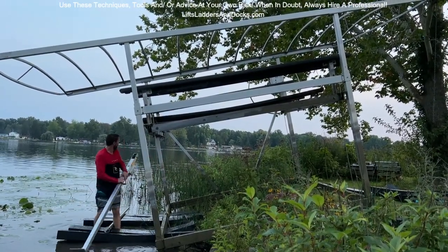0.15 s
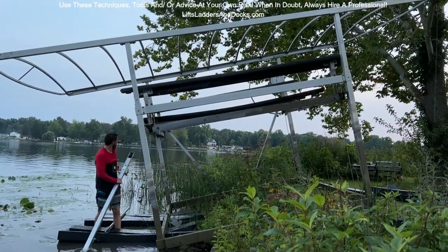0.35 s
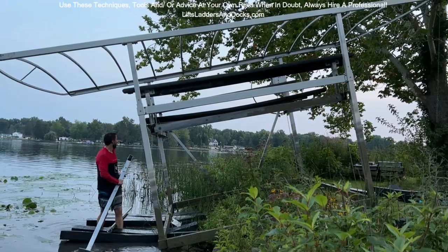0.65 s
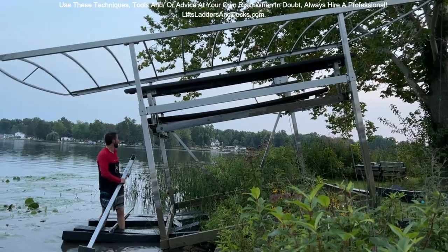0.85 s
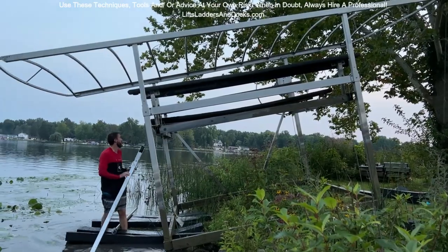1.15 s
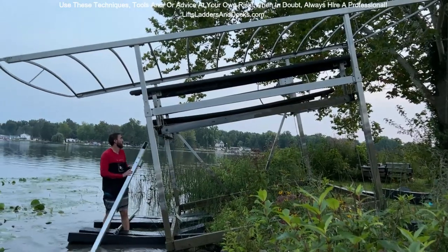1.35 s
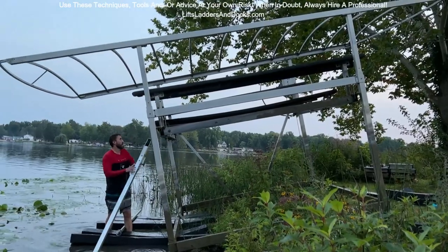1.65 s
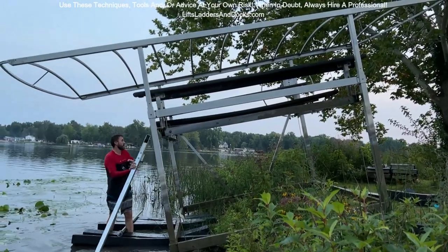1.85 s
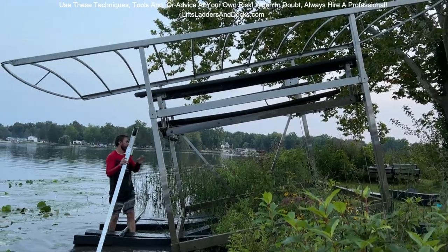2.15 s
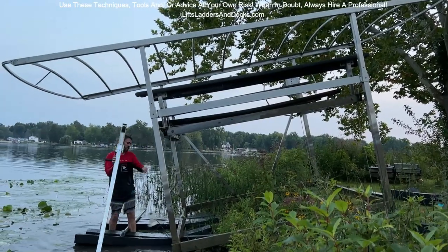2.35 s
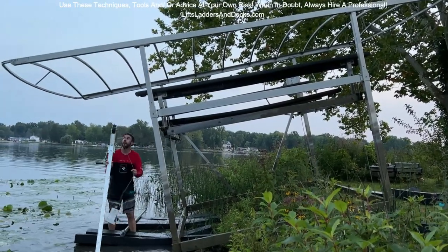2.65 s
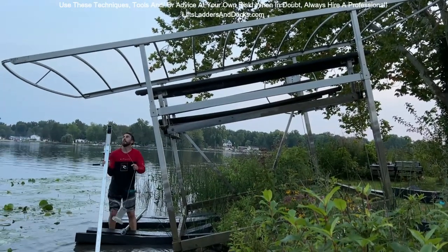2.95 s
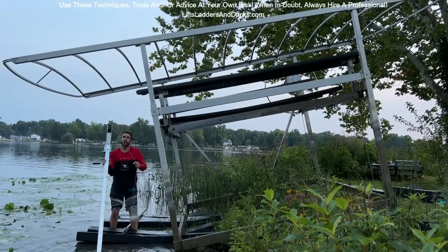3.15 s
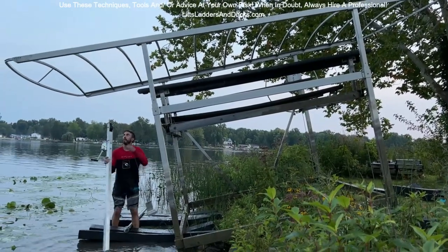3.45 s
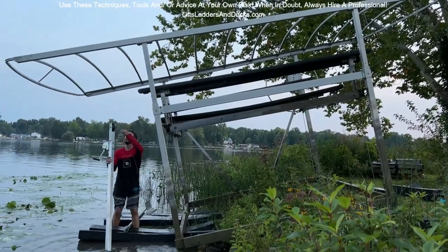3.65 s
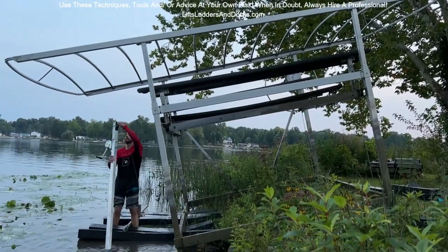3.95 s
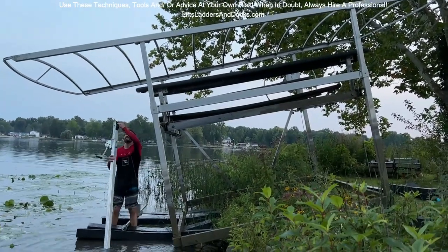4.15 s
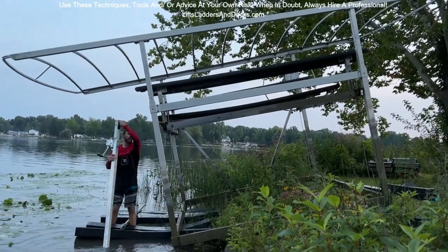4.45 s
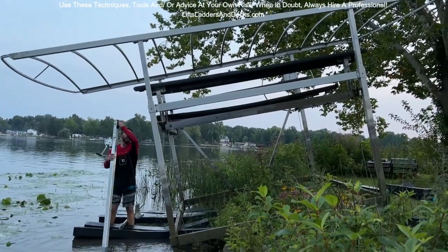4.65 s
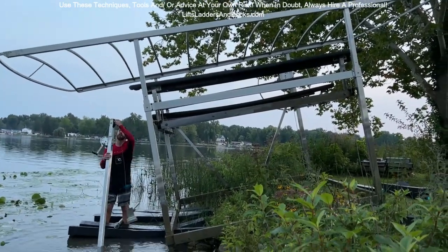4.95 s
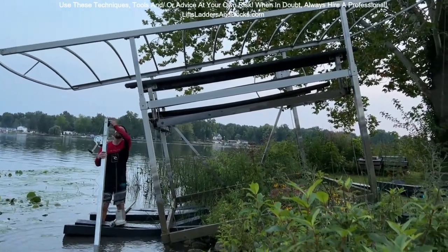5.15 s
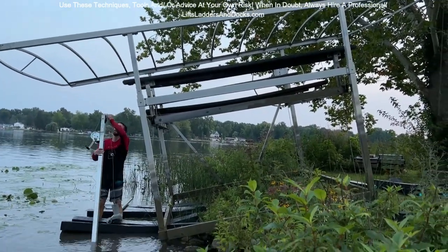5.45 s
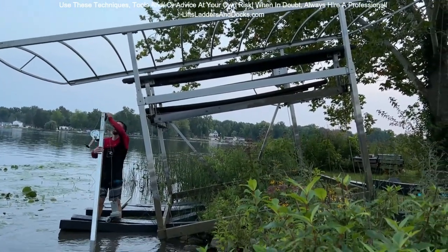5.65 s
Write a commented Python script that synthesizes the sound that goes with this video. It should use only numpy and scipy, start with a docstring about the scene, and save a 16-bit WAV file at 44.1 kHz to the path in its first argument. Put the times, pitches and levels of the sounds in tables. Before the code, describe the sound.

Dull metal blows, a bright pipe clank and a quick rattle sound from a boat lift on a quiet lakeshore with insects.

```python
"""An insect ticks in the reeds over the low rumble of a lake shore, and water laps at the dock.
A steel pipe is knocked against a metal boat lift: two dull blows and a scrape on the frame, one bright
clank of the pipe, a soft slide, then a rattle as it is set upright against the lift's fittings.
Twice the insect's ticks lead into a buzz. Heard from the bank, on a camera with two closely spaced
microphones; the lift is left of centre."""
import sys
import numpy as np
from scipy import signal
from scipy.fft import rfft, irfft, next_fast_len
from scipy.io import wavfile

SR = 44100
rng = np.random.default_rng(int(sys.argv[2]) if len(sys.argv) > 2 else 0)


def bounce(signal):
    """Save signal as a 16-bit WAV file at the path given by the first command-line argument."""
    frames = np.transpose(np.atleast_2d(signal))
    limited = np.clip(frames, -1, 1)
    pcm = np.round(limited * 32767).astype(np.int16)
    wavfile.write(sys.argv[1], SR, pcm)


N = 255558
T = np.arange(N) / SR
SIZE = next_fast_len(N)
FREQS = np.maximum(np.arange(SIZE // 2 + 1) * SR / SIZE, 1)
BANDS_HZ = 45 * 2 ** (np.arange(18) / 2)


def undb(db):
    """Decibels to gain."""
    return 10 ** (np.asarray(db) / 20)


def across(table, hz, column=1):
    """One column of a frequency table, read on a log axis."""
    table = np.array(table, float)
    return np.interp(np.log(hz), np.log(table[:, 0]), table[:, column])


def walk(rate):
    """Smooth random wander with a spread near 1."""
    points = rng.standard_normal(N // 40)
    return np.interp(T * rate, np.arange(len(points)), points)


def noise(gain, alike_hz=1567):
    """Unit stereo noise with the given spectrum; the two microphones hear nearly the same bass."""
    mid, side = rng.standard_normal((2, len(FREQS), 2)) @ np.array([1, 1j])
    alike = .97 / (1 + (FREQS / alike_hz) ** 2)
    mid, side = mid * np.sqrt(1 + alike), side * np.sqrt(1 - alike)
    stereo = irfft(np.array([mid + side, mid - side]) * gain, SIZE)[:, :N]
    return stereo / stereo.std()


def add(out, s, sound):
    """Mix a sound in at time s."""
    i = max(int(s * SR), 0)
    out[:, i:i + sound.shape[-1]] += sound[..., :N - i]


def efforts(rows, attack_s, release_s, growth_db_per_s):
    """Gain over time: each effort builds up, holds with a steady trend, then dies away."""
    power = 0
    for s, length, db in rows:
        held = undb(db + growth_db_per_s * np.clip(T - s, 0, length))
        attack = np.clip((T - s) / attack_s, 0, 1)
        release = np.exp(-np.maximum(T - s - length, 0) / release_s)
        power = power + (held * attack * release) ** 2
    return np.sqrt(power)


# The background at the bank. Each row: frequency in Hz, relative level in dB.
SHORE_COLOUR = [(15, -49), (25, -16), (59, 6), (110, -1), (229, -15), (362, -16), (412, -13), (444, -10),
                (685, -22), (1260, -24.5), (2330, -26), (4180, -31.5), (4990, -25.5), (10200, -50.5),
                (11000, -41.5), (14300, -67.5), (22000, -120)]
def shore(level_db=-53):
    """Low distant rumble and light air over the lake."""
    return noise(undb(across(SHORE_COLOUR, FREQS))) * undb(level_db + 1.1 * walk(20))


# Ticks from the reeds. Each row: start in seconds, length in seconds, ticks per second,
# first level in dB, growth in dB per second.
TICK_RUNS = [(-.033, .39, 9, -52, 10), (3.326, 1.18, 8.03, -62.5, 12)]
def ticking(attack_s=.0028, fade_s=.065):
    """Gain over time of the insect's ticks: evenly spaced wing flicks, each louder than the last."""
    gain = np.zeros(N)
    for s, length, rate, db, growth_db in TICK_RUNS:
        for after in np.arange(0, length, 1 / rate):
            age = np.maximum(T - s - after, 0)
            gain += undb(db + growth_db * after) * (1 - np.exp(-age / attack_s)) * np.exp(-age / fade_s)
    return gain


# The long buzz after each run. Each row: start in seconds, length in seconds, level in dB.
BUZZES = [(.52, 1.9, -49.5), (4.35, 1.5, -57)]
# The rasp of the wings. Each row: frequency in Hz, relative level in dB.
INSECT_COLOUR = [(6000, -46), (8500, -20), (10500, -33.5), (11600, -8), (12400, -10), (13700, -17),
                 (15500, -15), (17000, -12.5)]
def insects(stroke_hz=28, throb_db=1.5, flutter_db=2.4, chorus_db=-72):
    """Wing strokes rasp high in the treble: one insect ticks and buzzes over a far-off chorus."""
    strokes = np.sin(2 * np.pi * np.cumsum(stroke_hz * (1 + .04 * walk(4.5))) / SR)
    buzz = efforts(BUZZES, attack_s=.27, release_s=.1235, growth_db_per_s=-1.3) * undb(throb_db * strokes)
    song = np.sqrt(buzz ** 2 + ticking() ** 2 + undb(chorus_db) ** 2)
    return noise(undb(across(INSECT_COLOUR, FREQS))) * song * undb(flutter_db * walk(60))


# Water at the dock. Each row: start in seconds, bubble pitch in Hz, level in dB, t60 in seconds.
LAPS = [(0.145, 1196, -44, 0.15), (0.798, 1166, -47.5, 0.13), (1.103, 927, -34, 0.076),
        (3.64, 224, -32, 0.045), (3.67, 325, -41, 0.06), (4.823, 224, -35, 0.026),
        (4.913, 220.6, -41.5, 0.04), (5.044, 305, -36.5, 0.043), (5.762, 880, -44.5, 0.05)]
def water(splash_db=-2):
    """Each lap is a short bubble whose note rises a little, inside a small splash."""
    out, t = np.zeros((2, N)), T[:N // 25]
    for s, hz, db, t60 in LAPS:
        bubble = np.sin(2 * np.pi * hz * t * (1 + t))
        splash = noise(1 / (1 + np.log2(FREQS / hz) ** 2) ** 4)[:, :len(t)]
        fade = (1 - np.exp(-t / .0019)) * np.exp(-np.log(1000) * t / t60)
        add(out, s, undb(db) * fade * (bubble + undb(splash_db) * splash))
    return out


def crowded_modes(hz):
    """One band of closely spaced metal modes; toward the treble some stand well above the rest."""
    mode_index = (90 * np.log(1 + FREQS / 1200)).astype(int)
    strength_db = min(hz / 250, 5) * rng.standard_normal(N // 200)
    window = np.sqrt(np.maximum(1 - 2 * abs(np.log2(FREQS / hz)), 0))
    return noise(window * undb(strength_db[mode_index]))


def blows(hits, modes, body, bands, chatter_db, fade_power, modes_db):
    """Each blow on metal rings a few clear modes over a dense crowd of others."""
    out, t = np.zeros((2, N)), T[:N // 4]
    for s, db, rise, tilt_db, ring_factor, spot_hz, spot_db in hits:
        def colour(hz):
            """A harder contact is brighter, and each striking spot favours its own band."""
            return tilt_db * np.log2(hz / 1000) + spot_db * np.exp(-(2 * np.log2(hz / spot_hz)) ** 2)
        start = rng.integers(N - len(t))
        # the surfaces chatter for some milliseconds before they part
        chatter = undb(chatter_db * walk(900)[:len(t)] * np.exp(-t / .037))
        crowd = 0
        for hz, band in zip(BANDS_HZ, bands):
            # bending waves are faster in the treble, so the bass builds up later
            attack = 1 - np.exp(-t / (rise * np.sqrt(1000 / hz)))
            # many decay rates together: a quick drop, then a lingering tail
            fade = (1 + t / (ring_factor * across(body, hz, column=2))) ** -fade_power
            gain = undb(across(body, hz) + colour(hz))
            crowd = crowd + band[:, start:start + len(t)] * attack * fade * gain
        ring = 0
        for hz, mode_db, t60 in modes:
            # higher modes reach the two microphones further out of step
            phase = 2 * np.pi * rng.random() + (2 * rng.random((2, 1)) - 1) * min(hz / 1000, np.pi / 2)
            fade = np.exp(-np.log(1000) * t / (t60 * ring_factor))
            gain = np.sqrt(2) * undb(mode_db + modes_db + colour(hz))
            ring = ring + gain * fade * np.sin(2 * np.pi * hz * t + phase)
        add(out, s, undb(db) * (crowd * chatter + ring * (1 - np.exp(-t / rise))))
    return out


# Blows on the lift's frame. Each row: start in seconds, level in dB, rise in seconds, brightness
# in dB per octave, ring length as a factor, favoured band in Hz, its boost in dB.
FRAME_HITS = [(.304, -44.5, 0.0017, 8.5, 3.7, 7000, 2.5), (.402, 2, 0.0044, 0.5, 0.98, 4800, 0.5),
              (1.124, -23.5, 0.00069, 2.5, 2, 5300, 4.5), (1.186, -23.5, 0.0012, 0, 1.14, 1210, 2),
              (1.268, -5, 0.0015, -0.55, 1.04, 1497, 7.5), (1.599, -23.5, 0.0017, 0.5, 0.45, 611, 10),
              (1.665, -35.5, 0.0035, 4.5, 0.59, 650, 9.5), (1.692, -29, 0.0035, 4, 2.7, 723, 12.5),
              (1.955, -22.5, 0.013, -2.5, 0.87, 605, -2.5), (3.635, -23, 0.00097, 0, 0.12, 252, 7)]
# Its clear modes. Each row: frequency in Hz, relative level in dB, base t60 in seconds.
FRAME_MODES = [(260, -40, .4), (366, -31, .6), (360, -42, 2.3), (421, -33, .4), (440, -37, 1.6),
               (483, -45, 1.2), (520, -35, .7), (544, -39, .9), (575, -43, 1.1), (598, -29, .45),
               (642, -36, .9), (715, -31, .35), (755, -35, .55), (785, -41, .8), (878, -33, .6),
               (904, -24, .22), (943, -33, .6), (991, -39, .8), (1055, -33, .4), (1123, -36, .35),
               (1184, -40, .4), (1328, -29, .28), (1400, -41, .34), (1642, -32, .3), (1803, -39, .22),
               (2172, -42, .3)]
# Its crowd of modes. Each row: frequency in Hz, relative level in dB, base fading time in seconds.
FRAME_BODY = [(50, -45, .06), (132.4, -37, .08), (287.2, -29, 0.053), (640, -19.5, 0.071),
              (1031, -23.5, 0.047), (2140, -29, 0.039), (4550, -28.5, 0.022), (7900, -41.5, 0.045),
              (15000, -57, 0.034)]
def frame_knocks(bands):
    """The pipe strikes the frame, which answers with a dull, lingering ring."""
    return blows(FRAME_HITS, FRAME_MODES, FRAME_BODY, bands, chatter_db=4, fade_power=1.975, modes_db=-.5)


# The pipe landing on the frame. Each row: start in seconds, slip rate in Hz, length in seconds,
# level in dB.
JUDDERS = [(.404, 618, .043, -13.5), (1.271, 640, .022, -25), (1.70, 660, .035, -36)]
def judder(overtone_db=-20):
    """Steel sticks and slips on the frame: a short rough honk that stops when the pipe comes to rest."""
    out, t = np.zeros((2, N)), T[:N // 40]
    for s, hz, length, db in JUDDERS:
        phase = 2 * np.pi * np.cumsum(hz * (1 + .025 * walk(300)[:len(t)])) / SR
        honk = np.sin(phase) + undb(overtone_db) * np.sin(2 * phase)
        grip = (1 - np.exp(-t / .0015)) * np.exp(-(t / length) ** 8)
        roughness_db = 2.5 * walk(300)[:len(t)]
        add(out, s, np.sqrt(2) * grip * undb(db + roughness_db) * honk)
    return out


def scrape(push, colour, rings, grain_db, uneven_db=2.2):
    """Dense little catches of metal on metal, in uneven pushes, sounding the pipe's resonances."""
    boost_db = sum(db / (1 + (2 * (FREQS - hz) / width) ** 2) for hz, width, db in rings)
    friction = noise(undb(across(colour, FREQS) + boost_db))
    return friction * push * undb(grain_db * walk(500) + uneven_db * walk(50))


# The drag along the frame. Each row: start in seconds, length in seconds, starting level in dB.
DRAGS = [(1.675, 0.29, -46.5)]
# Its colour. Each row: frequency in Hz, relative level in dB.
DRAG_COLOUR = [(120, -42.5), (200, -34), (264, 4), (332, -43), (484, 8.5), (517, -5), (1270, -10.5),
               (1380, -10), (2450, -16.5), (3620, -21), (4060, -25), (6320, -28.5), (10000, -41),
               (13000, -48), (22000, -120)]
# Its resonances. Each row: frequency in Hz, width in Hz, boost in dB.
DRAG_RINGS = [(510, 59, 1), (1740, 120, 8), (3570, 52, 18.5), (4530, 140, 14.5), (5160, 120, 9),
              (6350, 89, 16)]
def pipe_drag():
    """The pipe drags along the frame in one push, leaning harder as it goes."""
    push = efforts(DRAGS, attack_s=.063, release_s=.041, growth_db_per_s=17)
    return scrape(push, DRAG_COLOUR, DRAG_RINGS, grain_db=3.5)


# Blows that ring the pipe, its clear modes and its crowd of modes. Rows read as for the frame.
PIPE_HITS = [(2.6865, 2, 0.0019, -2, 0.86, 3023, 0.54), (4.348, -35, 0.00072, -3.5, 0.55, 2100, 20),
             (4.988, -42.5, 0.0018, 1.5, 0.27, 2700, 8.6)]
PIPE_MODES = [(728, -22, .09), (1008, -14.5, .15), (1071, -39, .6), (1150, -29, .22), (1365, -33, .22),
              (1487, -49, .8), (1524, -18, .13), (1611, -33, .62), (1937, -27, .15), (2040, -28, .15),
              (2118, -48, .6), (2690, -24, .24), (2764, -29, .25), (2774, -48, 1.25), (2760, -51, 1.25),
              (2852, -24, .21), (2904, -29, .25), (2958, -27, .12), (3030, -32, .22), (3392, -32, .15),
              (3560, -22, .17), (3553, -53, .8), (4463, -33, .17), (4636, -34, .15), (5375, -35, .32),
              (6245, -42, .35), (8037, -42, .16), (11660, -39, .12)]
PIPE_BODY = [(100.6, -61.5, 0.0326), (275, -41, 0.035), (420, -27, 0.012), (705, -26, .02),
             (1094, -29.5, 0.06), (2157, -29, 0.067), (2930, -10, 0.0148), (4100, -18.5, 0.029),
             (5760, -14.5, 0.033), (8350, -24, 0.035), (12070, -15.5, 0.0072), (16000, -46.5, 0.028)]
def pipe_clank(bands):
    """The steel pipe itself rings: one bright clank, later two faint taps."""
    return blows(PIPE_HITS, PIPE_MODES, PIPE_BODY, bands, chatter_db=1.6, fade_power=2.2, modes_db=0)


# Faint hisses on both microphones. Each row: middle in seconds, spread in seconds, frequency in Hz,
# width in Hz, level in dB.
HISSES = [(3.176, 0.29, 5270, 1390, -60.5), (3.92, 0.28, 8740, 1202, -65), (4.417, 0.12, 8670, 986, -65),
          (4.637, 0.41, 1970, 290, -58.5), (5.545, 0.084, 1666, 497, -55.5)]
def hisses():
    """Narrow soft hisses that swell and fade."""
    out = np.zeros((2, N))
    for s, spread, hz, width, db in HISSES:
        swell = np.exp(-2 * ((T - s) / spread) ** 2)
        out += noise(1 / (1 + (2 * (FREQS - hz) / width) ** 2)) * undb(db) * swell
    return out


# The slide's pushes, colour and resonances. Rows read as for the drag.
SLIDES = [(3.71, 1.11, -63), (4.08, 0.33, -54.5), (4.28, .1, -55.5), (5.49, 0.089, -59)]
SLIDE_COLOUR = [(180, -12.5), (300, -5.5), (1110, -9.5), (1320, -15.5), (1770, -6), (2780, -25),
                (3060, -16), (8000, -28.5), (10400, -33), (17600, -120)]
SLIDE_RINGS = [(960, 160, 3.5), (1115, 36, 7), (1714, 250, 1.5), (2810, 110, 15)]
def pipe_slide():
    """The pipe slides into place in gentler pushes."""
    push = efforts(SLIDES, attack_s=.054, release_s=.059, growth_db_per_s=-2)
    return scrape(push, SLIDE_COLOUR, SLIDE_RINGS, grain_db=2.8)


# Blows on the lift's fittings, their clear modes and their crowd of modes. Rows read as for the frame.
FITTING_HITS = [(5.148, -0.5, 0.0014, 2.5, 0.87, 890, 5.9), (5.1935, 2.5, 0.0019, 1.5, 0.29, 1760, 6),
                (5.258, -6, 0.00057, 2.5, 0.25, 5900, 5.1), (5.359, -4, 0.0013, -1, 0.43, 6160, 0.54),
                (5.497, -20, 0.0028, 1.5, 0.14, 4630, 10.5), (5.592, -20.5, 0.014, -8.5, 0.4, 1175, 15.5)]
FITTING_MODES = [(195, -49, .3), (390, -45, .3), (867, -37, .25), (977, -42, .2), (1021, -43, .4),
                 (1157, -46, .35), (1197, -52, .9), (1546, -44, .2), (1608, -45, .25), (2028, -43, .35),
                 (2122, -52, .8), (2852, -44, .45), (2869, -45, .4), (2905, -50, 1.5), (3370, -46, .3),
                 (3553, -52, .7), (4506, -44, .35), (4775, -49, .5), (5028, -48, .3), (6185, -36, .1),
                 (6247, -35, .17), (7230, -48, .25), (8070, -52, .3), (8656, -47, .2)]
FITTING_BODY = [(99, -49, 0.059), (280, -36, 0.056), (570, -29.5, 0.037), (1000, -36.5, 0.037),
                (2010, -35, 0.07), (4400, -41, 0.083), (8100, -39, 0.044), (11800, -46, 0.011),
                (16000, -61.5, 0.022)]
def fittings_rattle(bands):
    """Set upright, the pipe knocks against the fittings in a quick run of blows."""
    return blows(FITTING_HITS, FITTING_MODES, FITTING_BODY, bands,
                 chatter_db=2.3, fade_power=2.2, modes_db=1)


# The lift as heard from the bank. Each row: frequency in Hz, left microphone minus right in dB.
LEFT_LEAD = [(60, 2), (1300, -0.5), (2400, 0.5), (4400, 7), (8000, -1), (15000, 2)]
def from_left(sound, lead_s=.00004):
    """The left microphone is slightly nearer the work: it gets it first, with more upper midrange."""
    lean = undb(across(LEFT_LEAD, FREQS) / 2) * np.exp(1j * np.pi * FREQS * lead_s)
    return irfft(rfft(sound, SIZE) * np.array([lean, 1 / lean]), SIZE)[:, :N]


def scene():
    """The work at the boat lift, left of centre, with the lakeside all around."""
    bands = [crowded_modes(hz) for hz in BANDS_HZ]
    knocks = frame_knocks(bands) + pipe_clank(bands) + fittings_rattle(bands)
    friction = pipe_drag() + pipe_slide() + judder()
    return from_left(knocks + friction) + water() + hisses() + insects() + shore()


def record(dry):
    """The camera on the bank cuts the treble above 15750 Hz."""
    return signal.sosfilt(signal.ellip(10, .2, 80, 15750, fs=SR, output="sos"), dry)


dry = scene()
out = record(dry)
bounce(out)
```